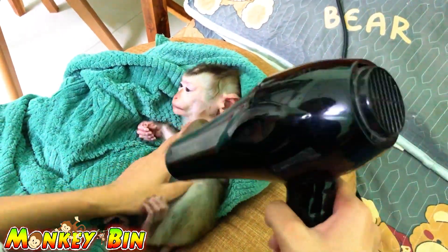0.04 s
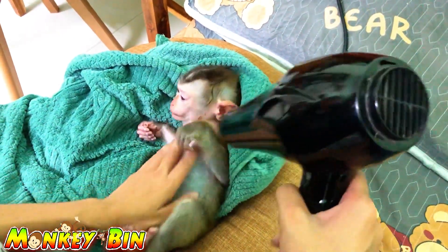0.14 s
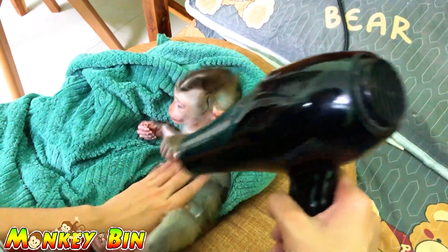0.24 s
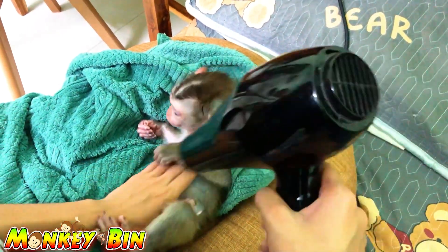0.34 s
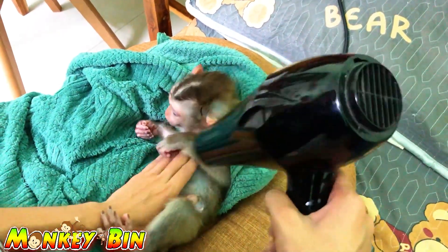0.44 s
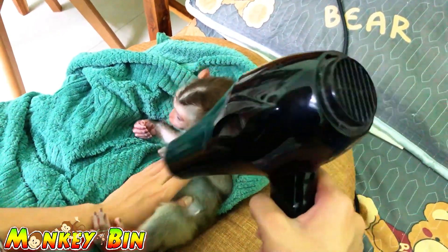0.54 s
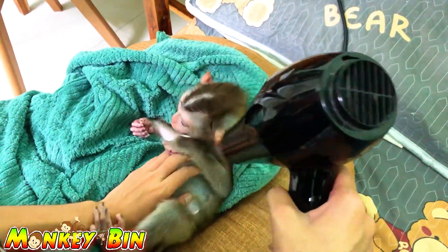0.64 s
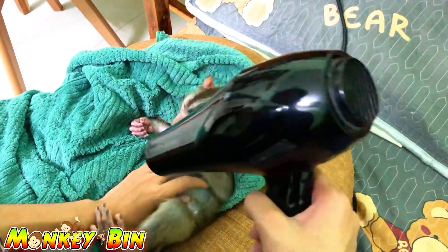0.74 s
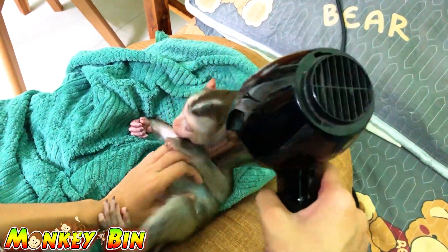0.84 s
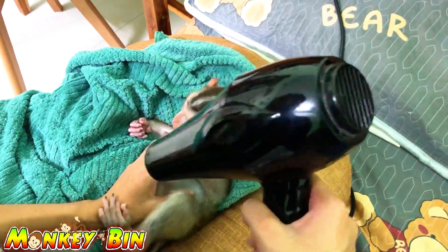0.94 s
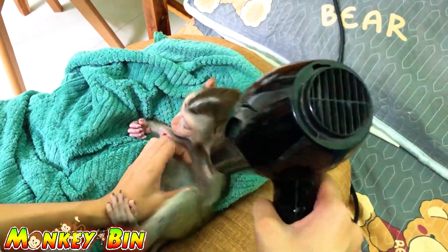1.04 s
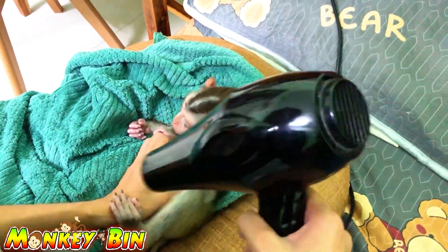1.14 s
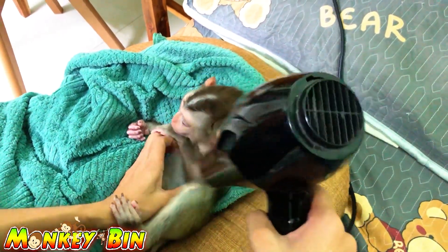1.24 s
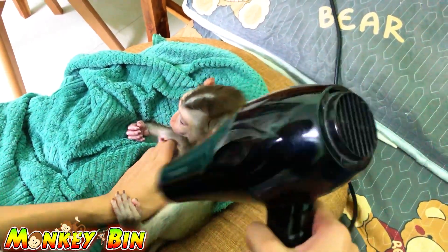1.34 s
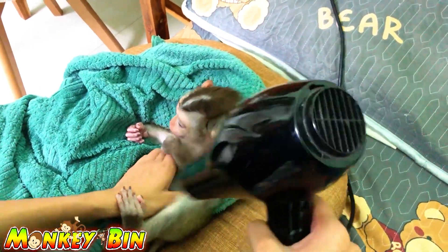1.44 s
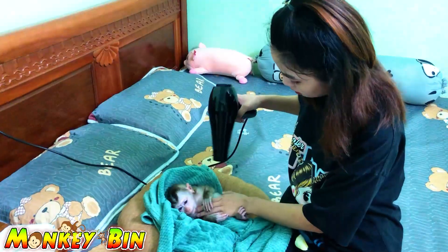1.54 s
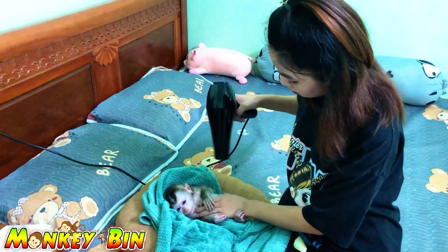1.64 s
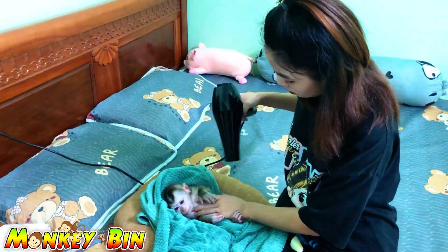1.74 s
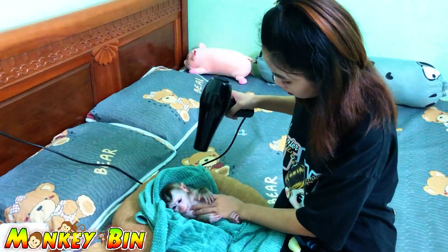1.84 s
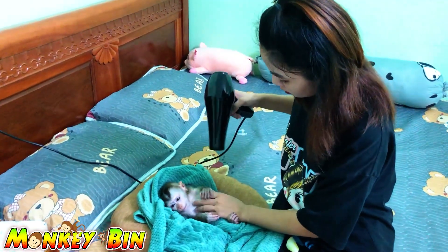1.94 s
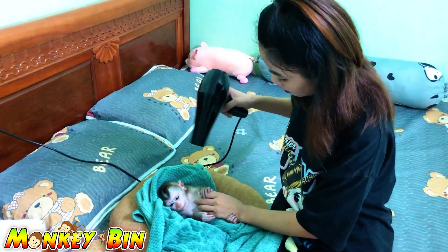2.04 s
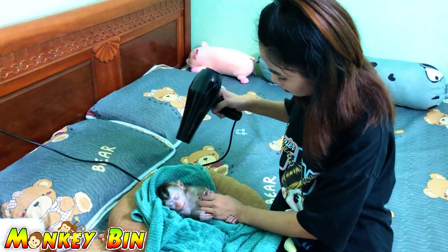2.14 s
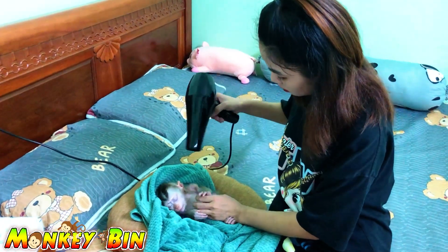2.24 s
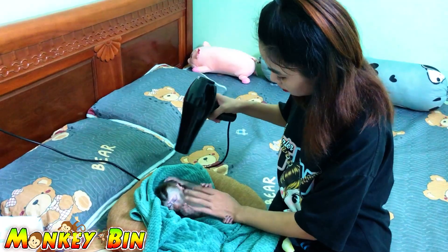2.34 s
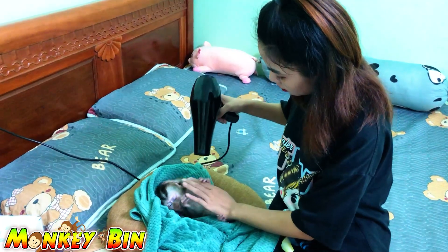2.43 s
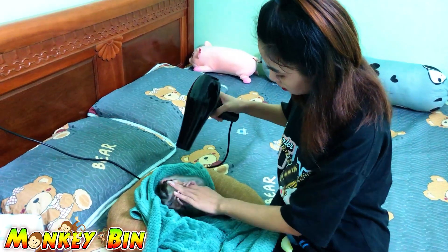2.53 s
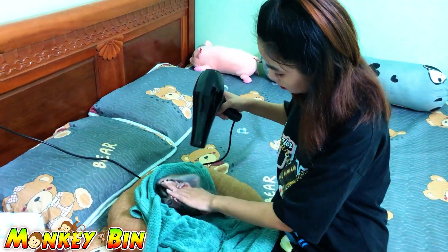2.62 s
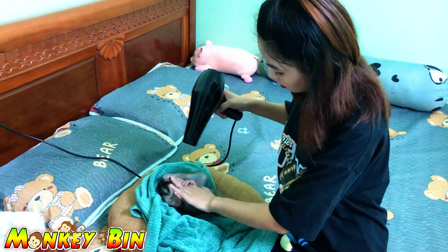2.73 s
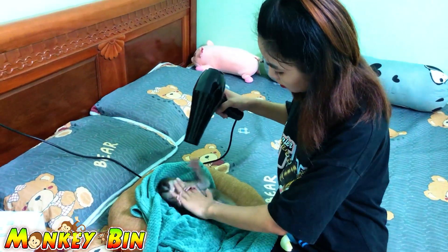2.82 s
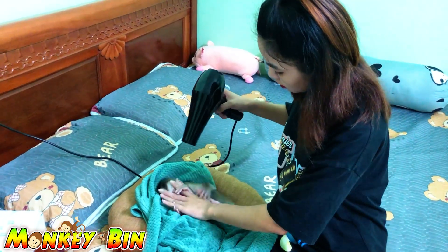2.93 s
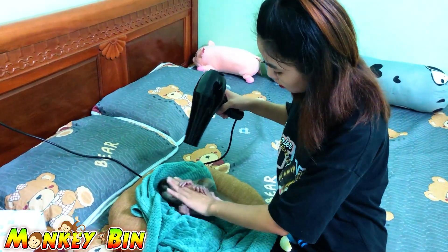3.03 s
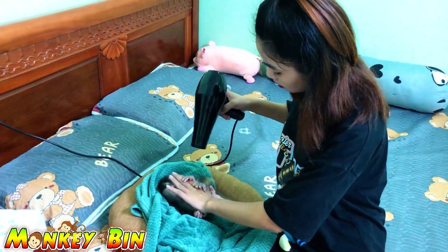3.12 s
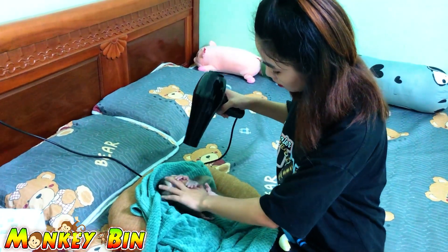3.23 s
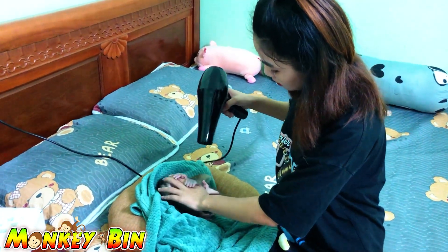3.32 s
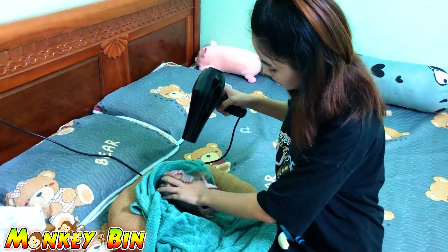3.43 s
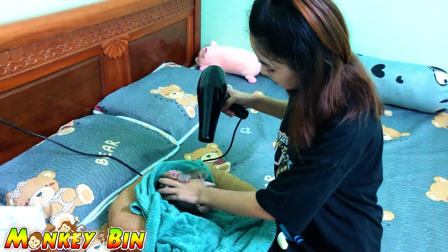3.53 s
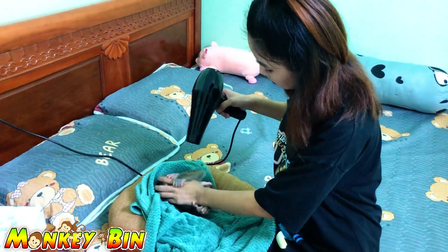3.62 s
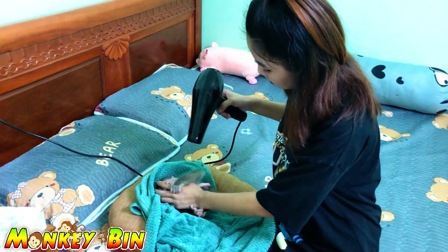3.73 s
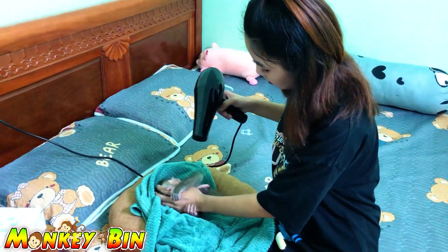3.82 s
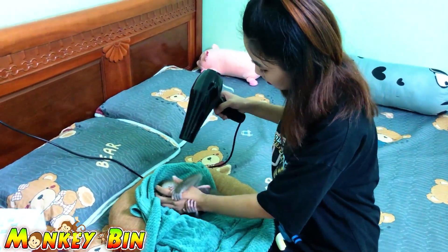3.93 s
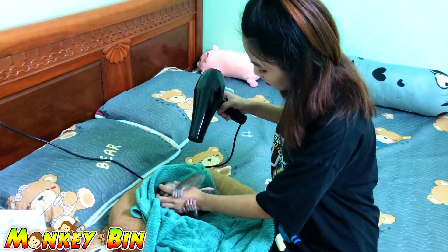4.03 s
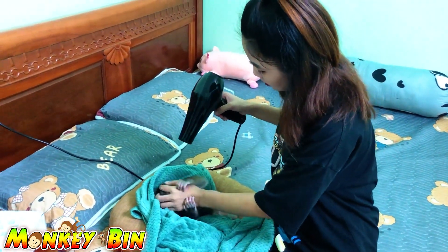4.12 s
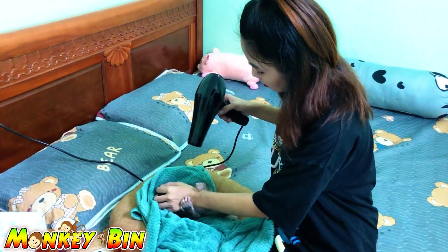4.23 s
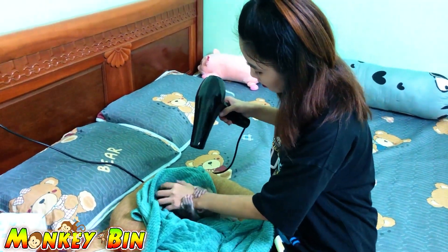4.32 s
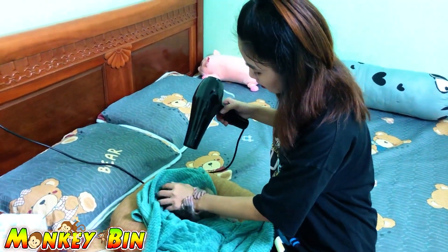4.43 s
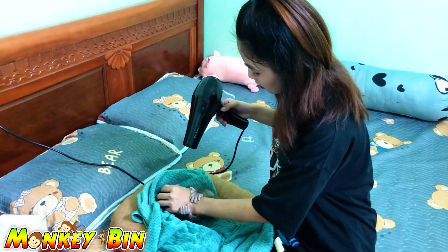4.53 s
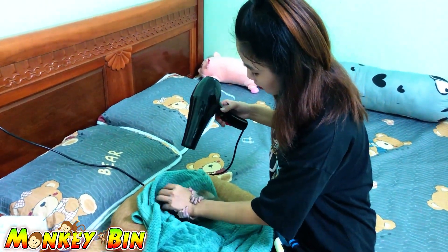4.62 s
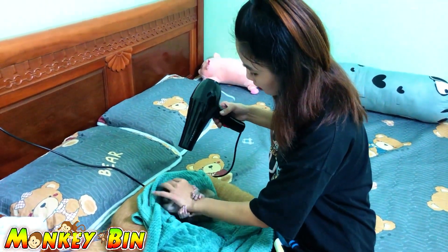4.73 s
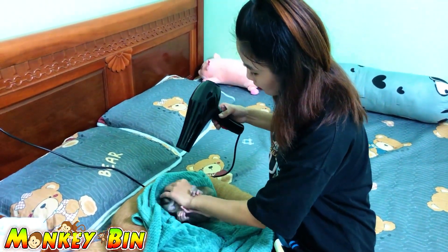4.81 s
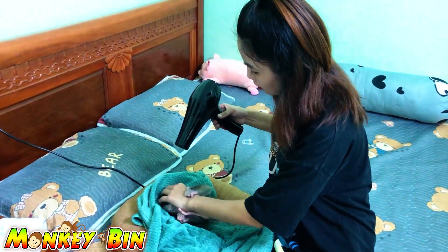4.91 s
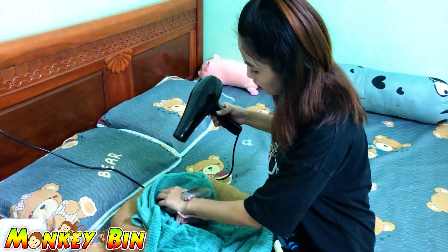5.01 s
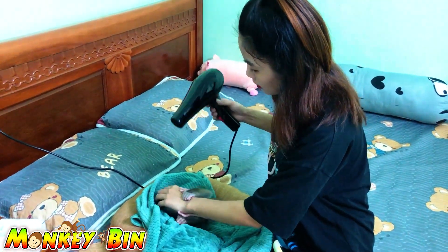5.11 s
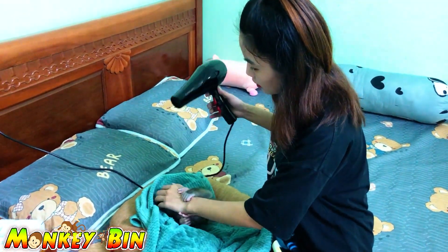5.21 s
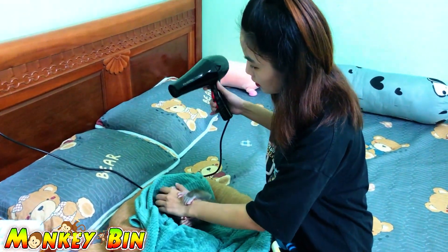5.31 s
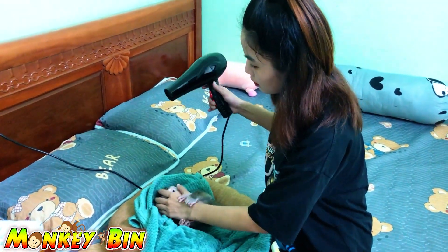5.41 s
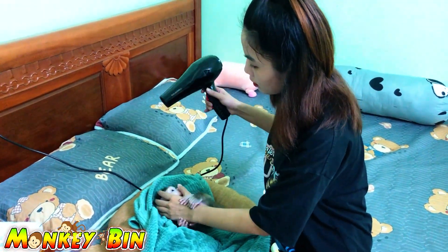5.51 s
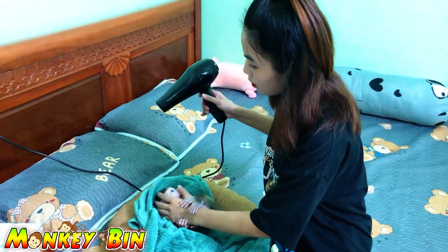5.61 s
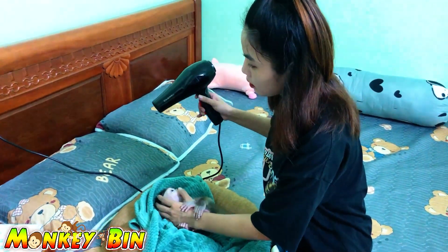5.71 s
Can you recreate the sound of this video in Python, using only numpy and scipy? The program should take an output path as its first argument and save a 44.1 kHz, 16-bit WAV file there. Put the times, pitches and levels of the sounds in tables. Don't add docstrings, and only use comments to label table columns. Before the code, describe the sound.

Steady hollow hair dryer roar with a wavering whistle, a sudden shift farther away, a quick motor coast-down, and a crisp plastic click.

```python
import sys
import numpy as np
from scipy import signal
from scipy.fft import rfft, irfft
from scipy.io import wavfile
from scipy.ndimage import uniform_filter1d

SR = 44100
rng = np.random.default_rng(int(sys.argv[2]) if len(sys.argv) > 2 else 0)


def nominal_scale(level):
    x = np.asarray(level, float) / 20
    return 10 ** x


def inscribe(sig):
    pcm = np.round(np.clip(np.atleast_2d(sig).T, -1, 1) * 32767)
    wavfile.write(sys.argv[1], SR, pcm.astype(np.int16))


N = 254016
T = np.arange(N) / SR
HZ = np.maximum(np.fft.rfftfreq(N, 1 / SR), 1)
OFF_S, SNAP_S = 4.71, 5.48755


def on_log(hz, table, column=1):
    table = np.array(table, float)
    return np.interp(np.log(hz), np.log(table[:, 0]), table[:, column])


def walk(rate):
    hold = int(SR / rate)
    steps = np.repeat(rng.standard_normal(N // hold + 1), 32)
    steps = uniform_filter1d(uniform_filter1d(steps, 32), 32)
    step_at = (np.arange(len(steps)) + .5) * hold / 32
    return 1.24 * np.interp(np.arange(N), step_at, steps)


def bumps(rows):
    coarse = T[::64]
    total = 0 * coarse
    for s, db, length in rows:
        total = total + db * np.exp(-(2 * (coarse - s) / length) ** 2)
    return np.interp(T, coarse, total)


def bands(spectrum):
    for hz in 30 * 2 ** np.arange(0, 9.6, .5):
        slope = np.clip(1 - 2 * abs(np.log2(HZ / hz)), 0, 1)
        yield hz, irfft(spectrum * slope, N)


def white():
    return np.sqrt(N / 2) * rng.standard_normal(2 * len(HZ)).view(complex)


def tone(hz):
    return np.sin(2 * np.pi * np.cumsum(hz) / SR)


def ring(hz, t60, length=2048):
    t = np.arange(length) / SR
    return np.sin(2 * np.pi * hz * t) * np.exp(-np.log(1000) * t / t60)


def rush(colour, span, column, aim_db, sway_db, walls_db, walls_t60=0.34):
    # centre in Hz, width in Hz, level over the rush close in dB,
    # level further off in dB, share of aiming from 0 to 1.
    resonances = [(243.3, 23, -0.5, 0.5, 0), (326, 47, -23, -10.5, 0), (385.6, 13.7, -24, 10.5, 0),
                  (484.3, 44.5, 5, 6.5, 0), (550.7, 20.6, 7.5, 10.5, 0.1), (592.4, 27.7, 4.5, 10, 0),
                  (664.5, 54, 3, 1, 0), (754.5, 52, -2, 4, 0), (839.7, 29, 6.5, 10.5, 0.34),
                  (893, 29, 3.5, 4.5, 0), (973, 37, 0.5, 5, 0.2), (1088, 110, -6, 4.5, 0.7),
                  (1372, 102, 13.5, 9, 1), (1607, 61, 3.5, -17, 0.2), (1961, 98, 7.5, 5.5, 0.4),
                  (2068, 95, 5.5, 4, 0.4), (2706, 214, -1.5, 2.5, 0.17), (3390, 240, 1, 1, 0),
                  (4360, 1500, 0.5, 1.5, 0), (6240, 630, 1, 1, 0.9)]
    # mode in Hz, time in s, change in dB, length in s.
    swells = [(386, 1.65, -4, .2), (386, 2.56, 2, .2), (386, 3.7, 2, 0.23), (483, 1.35, -6, 0.27),
              (483, 1.75, 3.5, 0.49), (483, 2.53, 0, 0.22), (483, 3.23, -5, 0.22), (550, .55, 3, .25),
              (550, 3.4, 4, 0.18), (550, 3.7, -3, .3), (550, 4.45, -5, 0.22), (594, .1, -2, .2),
              (594, 0.31, 9.5, .2), (594, 1.6, -5, .35), (594, 2.6, -3, .25), (594, 3.42, -4.5, 0.37),
              (594, 3.7, 7, 0.12), (594, 4.68, 2.5, .25), (594, 5.25, -4, .35), (550, 5.3, -4, 0.32),
              (550, 1.7, 7.5, .15), (243, 0.87, 7.5, 0.33), (1369, 1.18, 1.5, .12), (1369, 1.4, 2.5, .2),
              (666, 0.23, 4, .5), (666, 1.94, 4, .7), (750, 2, 2.5, 0.8), (840, .2, -1, 0.46),
              (840, 1, -7, 0.35), (840, 2.04, -5, .5), (840, 2.74, -3.5, .9), (840, 3.99, 5.5, 0.27),
              (840, 4.42, 3.5, .4), (840, 5.04, -6, .7), (750, 5, -6, 0.23), (964, 4.93, -6, .25),
              (896, 4.93, -5, .25), (1953, 4.75, -5, .15), (2067, 3.75, -4, .3), (483, 4.42, 2, .25),
              (896, .55, 6, .2), (896, 2.5, 3, 0.36), (964, 4.0, 7, .25), (1085, .7, 12, .2),
              (1085, 2.1, -9, 0.7), (1085, 3.7, -2.5, 0.61), (1369, 0.24, -1.5, 0.42), (1369, 0.67, -1, .3),
              (1369, 3.88, 2.5, .35), (1369, 4.85, -1.5, 0.27), (1953, .1, -2, .25), (1953, 0.63, -9, .3),
              (2067, 1.2, -4, .4), (2067, 2.05, -7, 0.18)]
    air = nominal_scale(on_log(HZ, colour))
    walls = rfft(rng.standard_normal(N) * np.exp(-np.log(1000) * T / walls_t60))
    reach = HZ ** 2 / (HZ ** 2 + 500 ** 2) * (.4 + .6 / (1 + (HZ / 2500) ** 2))
    walls = 1 + nominal_scale(walls_db) * reach * walls / np.sqrt(np.mean(abs(walls) ** 2))
    out = irfft(white() * air * walls, N)

    owner = [np.argmin([abs(row[0] - mode[0]) for mode in resonances]) for row in swells]
    for k, (hz, width, *db, aimed) in enumerate(resonances):
        swell_db = bumps([row[1:] for row, own in zip(swells, owner) if own == k])
        pipe = 1 / (1 + ((HZ ** 2 - hz ** 2) / (HZ * width)) ** 2)
        moving_db = swell_db + min(aimed, 1) * aim_db + sway_db * walk(3.51)
        ringing = irfft(white() * air * pipe, N)
        out[span] += nominal_scale(db[column] + moving_db[span]) * ringing[span]
    hiss = irfft(rfft(out) * (HZ > 2500) * (HZ < 12000), N)[span]
    return out / hiss.std()


def whistle():
    # time in s, level over the hiss in dB.
    lock = [(0, 7), (.35, 4.5), (.58, 4), (.77, 8), (.85, -5), (1.28, -8), (1.36, 5), (1.75, 5), (1.85, -2),
            (2.2, 4), (2.45, 1.5), (3.1, -0.5), (3.5, -5), (3.7, 1), (4.1, 1.5), (4.4, 0), (4.7, 2.5)]
    db = np.interp(T, *np.transpose(lock)) + 2.3 * walk(23.8)
    powered = np.clip((OFF_S + 0.11 - T) / .1, 0, 1)
    return nominal_scale(db) * powered * tone(551 * (1 + 0.011 * walk(24.96)))


def smooth(db):
    return uniform_filter1d(db, SR // 12, mode="nearest")


def dryer():
    # frequency in Hz, density in dB per Hz.
    near_colour = [(25, -56), (100, -22), (240, -10), (450, -6), (750, -7), (950, -13), (1400, -13),
                   (1750, -16), (3000, -17), (5200, -26), (7500, -22), (10000, -27), (12000, -33),
                   (16000, -41)]
    far_colour = [(25, -58), (100, -21), (250, -11), (480, -6), (700, -6), (930, -11), (1500, -12),
                  (2300, -16), (3700, -22), (5100, -27), (6800, -23.5), (9500, -28), (12000, -36),
                  (16000, -45)]
    # time in s, change in dB, length in s.
    turns = [(0.2, -2.5, 0.26), (0.527, 2, 0.11), (0.956, -4.5, 0.71), (1.16, 2, 0.12), (1.27, -7, 0.054),
             (1.407, 4.5, 0.18), (1.698, -7.5, 0.58), (3.05, -5, 0.073), (3.23, -6, 0.047),
             (3.33, 1, 0.055), (3.427, -6, 0.045), (3.82, 4.5, 0.079), (4.5, -3, 0.37)]
    # frequency in Hz, share.
    coast = [(60, 1.3), (280, 1), (570, 0.66), (800, 0.59), (1400, 0.52), (3000, 0.21), (4800, 0.14),
             (7000, -0.44), (12000, -.38)]
    move_s = 1.53
    near_db, far_db = -40, -41.5
    knee_s = 0.42
    braking = np.clip(T - OFF_S, 0, knee_s)
    idling = np.maximum(T - OFF_S - knee_s, 0)
    hiss_db = np.where(T < move_s, near_db, far_db) - smooth(78.5 * braking + 39 * idling)
    aim_db = bumps(turns)
    low_db = smooth(37.5 * braking) + 0.13 * aim_db
    aim_db = aim_db - 2 * braking / knee_s
    close = rush(near_colour, T < move_s + .01, 0, aim_db, sway_db=2.0, walls_db=-9.0)
    away = rush(far_colour, T > move_s - .01, 1, aim_db, sway_db=1.0, walls_db=-2.5)
    fade = np.pi / 2 * np.clip((T - move_s) / .003, 0, 1)
    air = close * np.cos(fade) + away * np.sin(fade)

    out, gust = 0, walk(5.28)
    for hz, band in bands(rfft(air)):
        share = on_log(hz, coast)
        out = out + band * nominal_scale(share * low_db + 0.24 * gust + 0.79 * walk(7.0))
    return (out + whistle()) * nominal_scale(hiss_db)


def quiet():
    # frequency in Hz, density in dB per Hz.
    hush_colour = [(25, 6), (310, -1.5), (568, -6), (1210, -10), (2640, -12), (8170, -16), (13500, -22),
                   (15700, -37)]
    hush = irfft(rfft(rng.standard_normal(N)) * nominal_scale(on_log(HZ, hush_colour)), N)
    return nominal_scale(-69.5) * hush / hush.std()


def flickers(mid):
    # time in s, band centre in Hz.
    flecks = [(.415, 7600), (.484, 15150), (.879, 7600), (.879, 5000), (.972, 6300), (1.088, 5700),
              (1.088, 14800), (1.947, 13100), (1.947, 15150), (2.528, 6300), (2.528, 12400), (2.737, 14450),
              (3.108, 5700), (3.155, 10400), (3.387, 15150), (3.503, 12400), (3.526, 5750), (3.526, 11400),
              (4.13, 14100), (4.2, 8300), (4.2, 15150), (4.989, 8300), (4.989, 13100), (5.384, 9700)]
    length, first, width_hz = 2048, 887, 1450
    half = length // 2
    out = np.zeros(N)
    window = signal.windows.cosine(length)
    hz = (np.arange(half) + .5) * SR / length
    for (s, centre_hz), sizes in zip(flecks, rng.standard_normal((len(flecks), half))):
        start = first + half * (round((s * SR - first) / half) - 1)
        lines = np.flatnonzero(abs(hz - centre_hz) < width_hz / 2)
        phase = np.pi / half * np.outer(lines + .5, np.arange(length) + .5 + half / 2)
        waves = window * np.cos(phase)
        own = waves @ mid[start:start + length]
        out[start:start + length] += nominal_scale(-3.5) * 2 / half * own.std() * sizes[lines] @ waves
    return out


def motor():
    since = np.maximum(T - OFF_S, 0)
    hz = 447 * np.exp(-.55 * since) * (1 + 0.0298 * walk(40))
    level = nominal_scale(-51 - 32 * since + 3.3 * walk(30))
    return level * np.clip(since / .15, 0, 1) * tone(hz)


def barrel():
    since = np.maximum(T - OFF_S, 0)
    hz = 588 * (1 + 0.0149 * walk(30))
    level = nominal_scale(-36 - 76 * since + 3.9 * walk(22.05))
    return level * np.clip(since / 0.14, 0, 1) * tone(hz)


def switch():
    # time in s, peak in dB, centre in Hz, length in s.
    ticks = [(5.166, -53, 5600, .0015), (5.1672, -54, 2500, .002), (5.1665, -63, 8500, .0015),
             (5.167, -64, 12200, .002), (5.173, -68, 12000, .001), (5.1785, -52, 2700, .001),
             (5.1785, -59, 5500, .001), (5.197, -68, 12000, .002), (5.434, -65, 8000, .0006),
             (5.445, -61, 4000, .0006), (5.4537, -55, 6200, .001), (5.4545, -54, 3300, .0015),
             (5.4542, -62, 11500, .001), (5.4793, -54, 8500, .0012), (5.4793, -51, 2500, .002),
             (5.484, -49, 7500, .001)]
    # mode in Hz, level in dB, t60 in s.
    plastic = [(570, -33, 0.011), (1650, -17.5, 0.0051), (2670, -17, 0.0036), (4340, -10, 0.0022),
               (6100, -5, 0.0029), (8760, 0.5, 0.0018), (10700, -3.5, 0.002), (12500, -3.5, .002),
               (15100, -9, .0012)]
    # mode in Hz, level in dB, t60 in s.
    room_modes = [(260, -45, 0.091), (523, -41, 0.076), (572, -47, .18), (720, -39, .07), (900, -40, .05),
                  (643, -51, .15), (822, -49, .15), (990, -45, .1), (1300, -45, .07), (1620, -45, .06),
                  (1970, -44, .06)]
    snap_db = -18
    out = np.zeros(N + 4096)
    body = sum(nominal_scale(db) * ring(hz, t60) * (-1) ** k for k, (hz, db, t60) in enumerate(plastic))
    body = signal.sosfilt(signal.butter(1, 900, "high", fs=SR, output="sos"), body)
    body /= -abs(body).max()

    for (s, db, hz, length), grit in zip(ticks, rng.standard_normal((len(ticks), 2048))):
        ping = np.hanning(40) * np.sin(2 * np.pi * hz * T[:40])
        scrape = np.convolve(grit * np.exp(-T[:2048] / length), ping)[:2048]
        out[int(s * SR):][:2048] += nominal_scale(db) * scrape / abs(scrape).max()

    # (lag s, dB)
    contacts = ((0, -18), (.00022, -15), (.0006, 4.5), (.001, -15), (.0012, -21), (.0039, -19),
                (.0021, -19), (.007, -15), (.0107, -18), (.0145, -13))
    for lag, db in contacts:
        out[int((SNAP_S + lag) * SR):][:len(body)] += nominal_scale(snap_db + db) * body
    for hz, db, t60 in room_modes:
        swell = ring(hz, t60, length=8192) * np.clip(T[:8192] / 0.015, 0, 1)
        out[int(SNAP_S * SR):][:8192] += nominal_scale(snap_db + db) * swell
    return out[:N]


def room(x, wet_db, gap_s=0.0027):
    # frequency in Hz, t60 in s, level in dB.
    decay = [(150, 0.55, 5), (590, 0.47, 11), (950, .46, 9), (1504, 0.44, 2.5), (3000, 0.42, 2),
             (4400, 0.46, -1.5), (6000, 0.37, -10.5), (11000, 0.38, -7), (13500, .33, -9), (16100, .3, -9)]
    t = T[:SR]
    echoes = 0
    for hz, band in bands(rfft(rng.standard_normal(N))):
        echoes = echoes + band[:SR] * nominal_scale(on_log(hz, decay, column=2) - 60 * t / on_log(hz, decay))
    echoes = echoes * np.clip(t / gap_s, 0, 1) ** 2
    return x + nominal_scale(wet_db) * signal.oaconvolve(x, echoes)[:N]


def scene():
    mono = dryer() + quiet() + motor() + barrel() + room(switch(), wet_db=-27)
    return np.tile(mono, (2, 1))


def band_limit(x):
    return signal.sosfilt(signal.butter(12, 16510, fs=SR, output="sos"), x)


def record(dry):
    full = signal.sosfilt(signal.butter(2, 39.6, "high", fs=SR, output="sos"), dry[0])
    mid = signal.fftconvolve(full, signal.firwin(767, 15730, fs=SR), "same")
    mid += (full - mid) * np.exp(-((T - SNAP_S) / .004) ** 2)
    return band_limit(mid + np.outer([1, -1], flickers(mid)))


dry = scene()
out = record(dry)
inscribe(out)
```